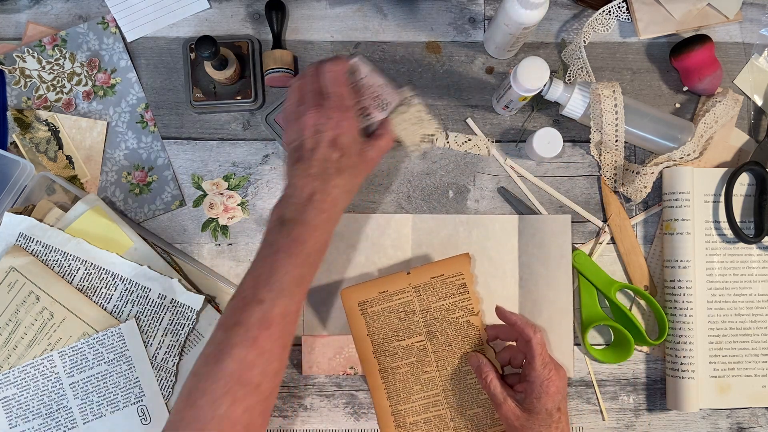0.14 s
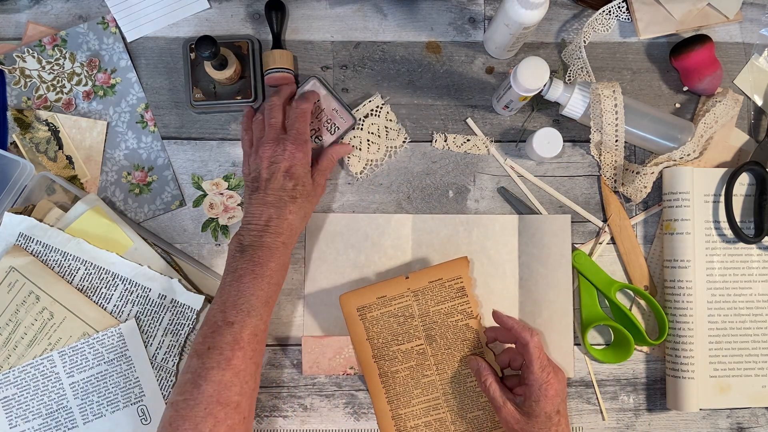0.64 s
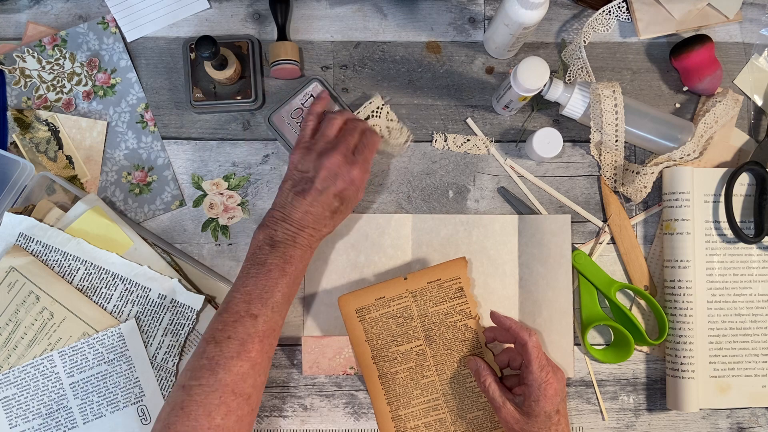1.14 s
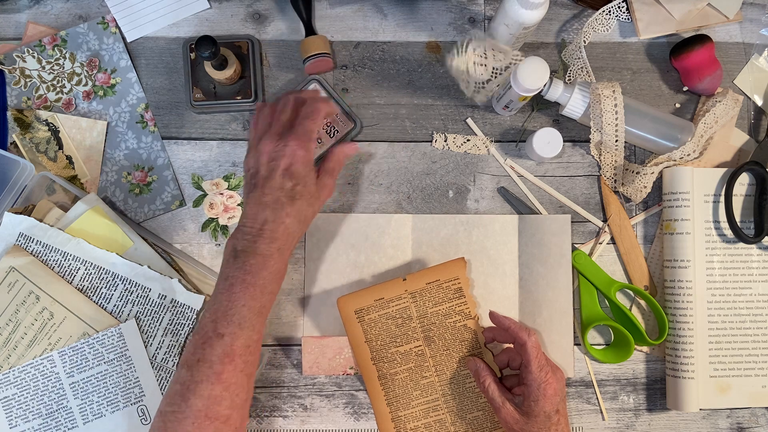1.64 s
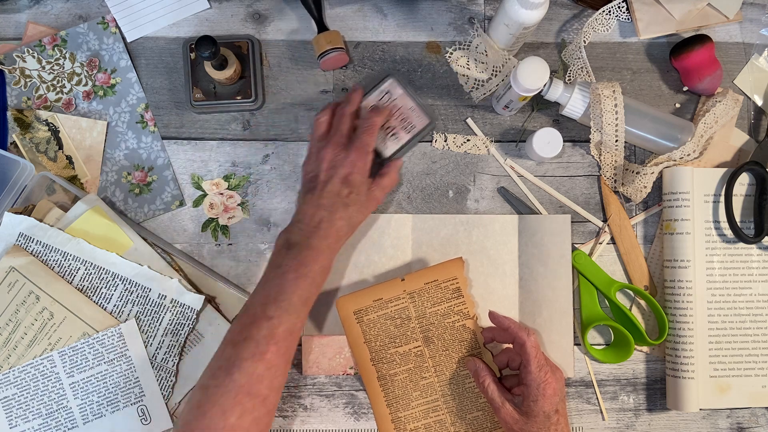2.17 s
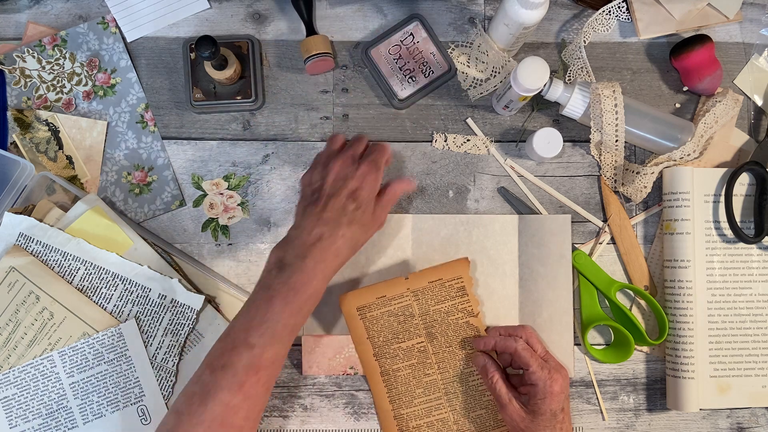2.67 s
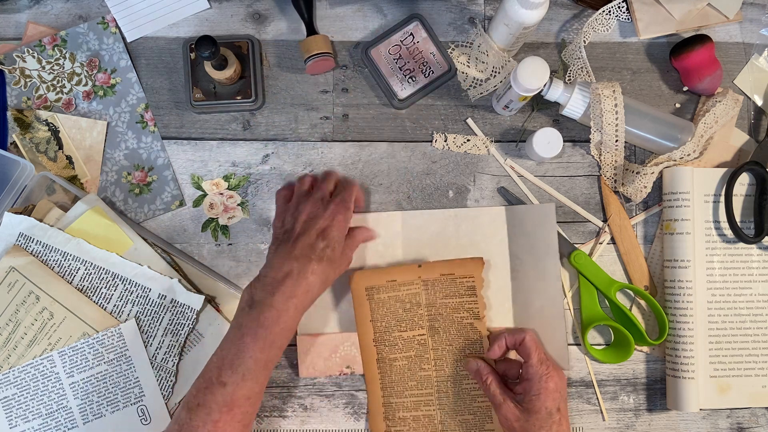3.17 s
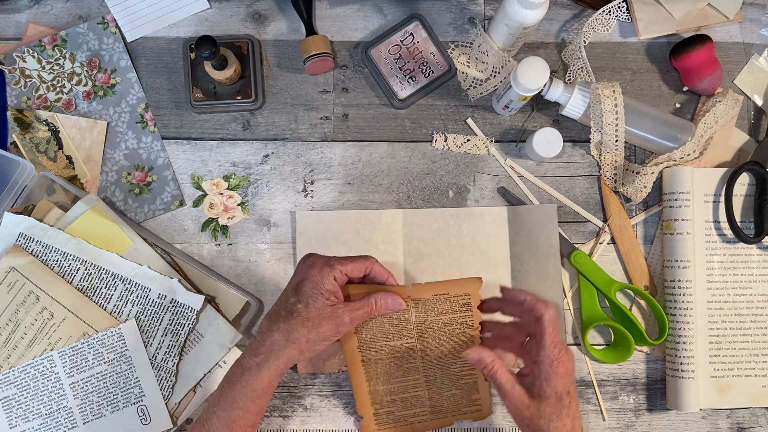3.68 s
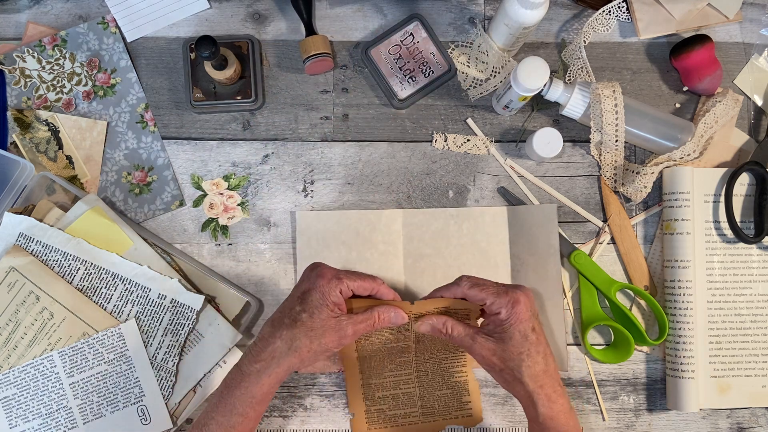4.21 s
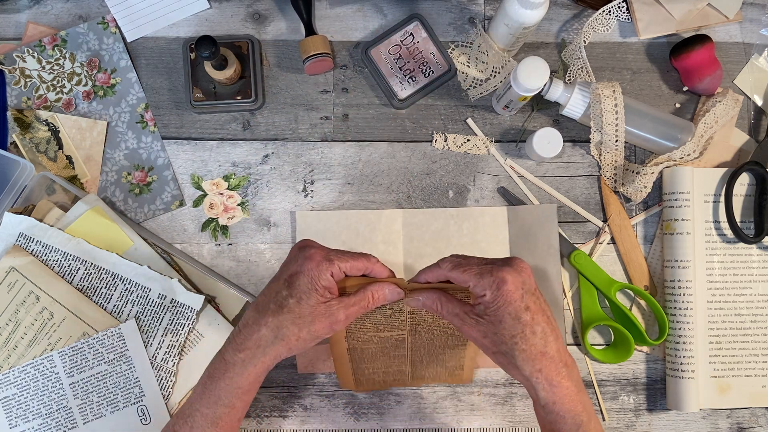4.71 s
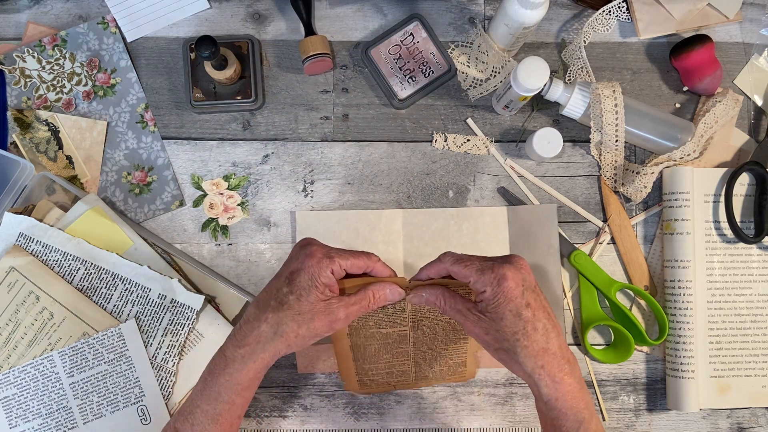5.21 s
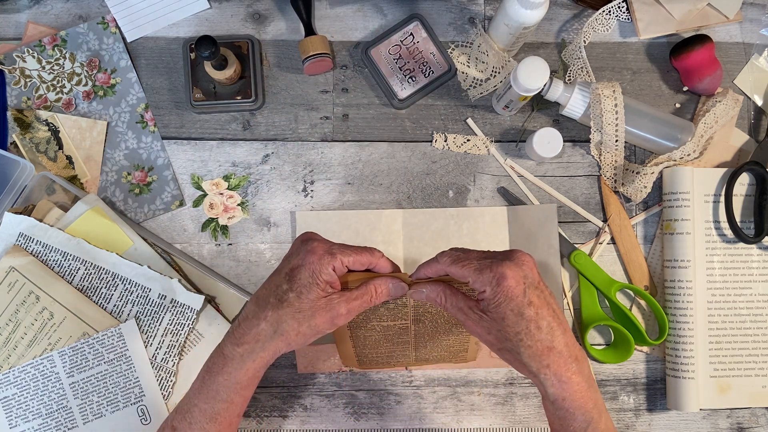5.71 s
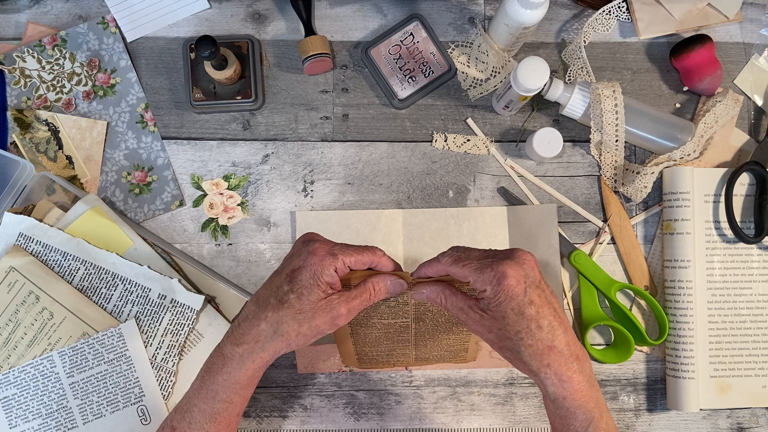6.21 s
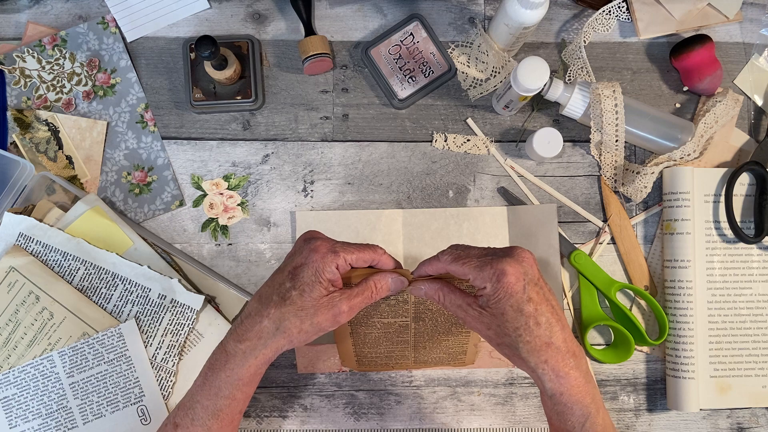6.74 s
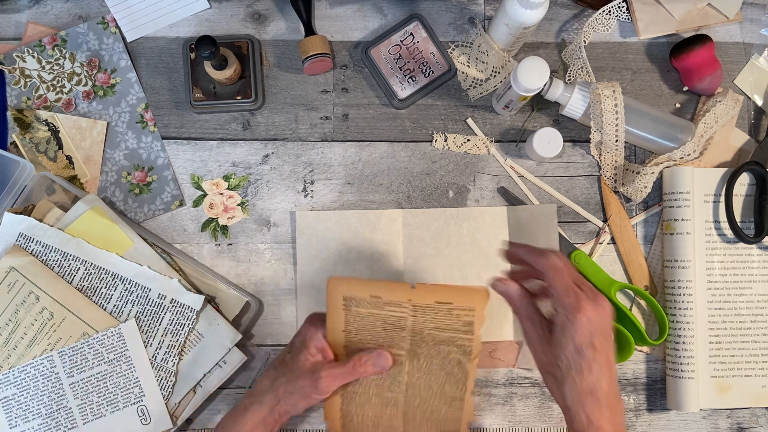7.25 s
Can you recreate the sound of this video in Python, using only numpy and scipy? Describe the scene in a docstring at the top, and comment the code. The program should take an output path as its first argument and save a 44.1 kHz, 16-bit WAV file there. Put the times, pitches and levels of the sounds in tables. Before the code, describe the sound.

A quiet, dry room with a faint low rumble, heard closely in stereo at a wooden craft table. After a barely audible brush at the start, a hollow plastic case clicks and rattles at 0.5-0.8 s, with faint handling, then clatters again at 1.15-1.4 s as its lid closes. At 1.8 s it is set down with the strongest plastic knock and a soft table thud, then scrapes away until about 2.5 s, with another click at 2.2. From 2.7 s, dry paper rustles and slides, with small snaps near 3.0, 3.6 and 4.6 s and very light thuds. From about 4.9 to 6.8 s it is nearly silent, with only tiny crackles and faint rubbing as paper is pinched. At 6.85 s rustling returns, with sharp loud snaps around 7.0 and 7.2 s and brisk crinkling to the end.

```python
"""Sheets of old paper slide, are picked up, pinched and snap at a wooden craft table: grainy noise makes
the rustle, short crackling bursts the snaps. Before that, hands click a small plastic case shut, set it
down and push it away: brief contacts and scraping ring the shell's resonances. Thuds are decaying
sines of the table top. A quiet room rumbles below, with short dull echoes; two microphone ports hear
it all, with level and phase offsets between them."""
import sys
import numpy as np
from scipy import signal
from scipy.fft import rfft, irfft, next_fast_len
from scipy.io import wavfile

SR = 44100
rng = np.random.default_rng(int(sys.argv[2]) if len(sys.argv) > 2 else 0)


def materialize(psi):
    """Save the field psi as 16-bit PCM at rate SR to the path in sys.argv[1].

    A 1-D psi becomes a single channel; in a 2-D psi each row is a channel.
    """
    bounded = np.clip(np.atleast_2d(psi).T, -1, 1)
    quanta = np.round(bounded * 32767).astype(np.int16)
    wavfile.write(sys.argv[1], SR, quanta)


def gain_from_db(level_db):
    """Turn a decibel level (scalar or array-like) into a linear amplitude factor."""
    decades = np.asarray(level_db, float) / 20
    return 10 ** decades


N = 325017   # samples, about 7.4 s

# rustling and rubbing noises of paper, skin and sliding case; the first is a brief noise at the opening:
# (start [s], length [s], rustle level [dB], flex re rustle [dB], fine hiss re rustle [dB])
RUBBING_STROKES = [(0, 0.021, -61.5, -8, -0.5), (.15, 0.075, -72.5, -16, 2.5), (.3, 0.02, -75.5, 1, 0),
                   (.51, 0.3, -69.5, -8, -4.5), (.955, .14, -72.5, -5.5, -3), (1.13, .26, -65, -13, -5),
                   (1.7, 0.054, -87.5, 4, 13), (1.8, 0.024, -44, -10, -2.5), (1.86, 0.058, -63.5, 0, -4),
                   (1.94, .53, -51.5, -9, 2.5), (2.56, 0.15, -76, -5, 2), (2.715, 0.1, -64.5, -4.5, -1),
                   (2.84, 0.22, -53.5, -11, -3), (3.05, .22, -54.5, -14, -2),
                   (3.28, 0.14, -60.5, 0.5, -1.5), (3.53, 0.093, -59, 3.5, -0.5),
                   (3.59, 0.13, -70.5, 6.5, 3), (3.71, 0.061, -65.5, -1.5, -1.5),
                   (3.795, 0.093, -57.5, -13.5, -4.5), (3.93, 0.23, -71, -10.5, 0.5),
                   (4.145, 0.27, -56, -7, 0), (4.44, 0.15, -63.5, -7.5, -1.5),
                   (4.6, 0.46, -70.5, -6.5, -3.5), (4.62, 0.11, -68, 0, 0), (4.76, .08, -63.5, -6.5, -1),
                   (4.9, 0.14, -73, 3.5, -1), (5.08, .08, -76, 12, 2), (5.15, 0.13, -74, -0.5, -2),
                   (5.27, 0.079, -69.5, -3, 1), (5.43, 0.25, -69, -7.5, 2), (5.7, 1.17, -95.5, 9.5, -1),
                   (6.06, 0.14, -73.5, -3, -1.5), (6.23, 0.038, -87, -6, 2), (6.43, 0.049, -82.5, 7, -7),
                   (6.58, 0.12, -92.5, 13.5, 3), (6.845, 0.29, -53, -5.5, 1.5),
                   (7.03, 0.063, -58.5, 4.5, -3), (7.11, 0.14, -47, -4, -2),
                   (7.265, 0.067, -48, -6.5, -1.5), (7.345, 0.086, -48.5, 1, -8)]
# hands at rest still stir the paper: (rustle [dB], flex [dB], hiss [dB])
RESTING_LEVELS = (-85, -87.5, -85)
# colour of the rustle: (frequency [Hz], gain [dB])
RUSTLE_COLOUR = [(150, -18), (400, -13), (900, -3), (1500, 0), (3000, 0), (6000, -1), (9000, -5),
                 (15500, -14)]
# pitches favoured by the sheets and the boards under them: (frequency [Hz], width [Hz], middle level [dB])
SHEET_MODES = [(1020, 400, -4.5), (1572, 150, -1), (2008, 390, -5.5)]
# every stroke swells over a share of its length, arches (ends below middle) and lets go (time constant)
ATTACK_SHARE, ARCH_DB, RELEASE_S = 0.14, 4.5, 0.027

# spectral shape of the room tone: (frequency [Hz], relative density [dB])
ROOM_COLOUR = [(12, -39), (20, -9), (49, -1.5), (101, -10), (148, -22.5), (306, -28.5), (549, -38.5),
               (906, -43.5), (1380, -45.5), (1500, -51.5), (1820, -39), (3000, -48.5), (15500, -55)]
ROOM_DB = -66   # middle rms level

# lid and case clicks: (time [s], peak level [dB], belly mode boost below 2.3 kHz [dB], treble mode boost above
# 4.3 kHz [dB])
CASE_CLICKS = [(0.513, -23.5, 4, 2), (0.569, -31, 8, -18), (0.582, -32, 5, -13), (0.614, -32, 20.5, 10.5),
               (0.673, -30, 10, -6), (0.684, -34, 20, -31), (0.807, -46, 5.5, -7), (1.159, -50, 14, -10),
               (1.175, -28.5, 8.5, -4.5), (1.219, -45, -6, -15), (1.224, -27.5, 14.5, -1),
               (1.293, -40.5, 20, -16), (1.302, -23.5, 1, 2), (1.33, -29.5, 9.5, 2), (1.344, -38.5, 8, -16),
               (1.377, -36.5, -0.5, -30), (1.729, -60, -17, 25), (1.802, -20, 10, 3),
               (1.895, -51.5, 8, -25), (2.223, -24.5, -11, 2), (2.39, -38, -25, -41)]
# resonances of the plastic case: (frequency [Hz], width [Hz], level [dB])
CASE_MODES = [(500, 150, -20), (1010, 110, -12), (1180, 130, -5), (1430, 110, -4), (1640, 110, -2),
              (1870, 120, -2), (2700, 150, -2), (2890, 150, 0), (3700, 160, -5), (4860, 150, -3),
              (5950, 180, 0), (6950, 200, -12), (8200, 300, -16)]
# fingers shift the case: (start [s], length [s], rim level [dB], belly re rim [dB], table rumble re rim [dB])
CASE_SHIFTS = [(.52, .11, -58, -6, -7), (.67, 0.041, -69.5, 15, 3), (.8, 0.05, -82.5, 10, 23.5),
               (.94, 0.21, -92, -7, 13.5), (1.16, 0.1, -63.5, 11.5, 3.5), (1.29, 0.082, -60, 11.5, 1),
               (1.47, 0.055, -94, -7, 25), (1.8, .1, -67, 9.5, 14.5)]
# the case is pushed away over the boards: (time [s], rim level [dB])
CASE_PUSH = [(1.93, -69), (1.974, -60.5), (2.05, -58), (2.154, -50.5), (2.25, -57), (2.33, -53),
             (2.426, -47.5), (2.54, -77.5)]
PUSH_BELLY_DB, PUSH_RUMBLE_DB = -16, -10.5   # re rim
CHATTER_S = 0.0025   # time constant of a click's short chatter of contacts
# clicks after this time: the lid is shut, the lowest modes gain and the upper belly modes are damped
SHUT_S, SHUT_LOW_DB, SHUT_HIGH_DB = 1.27, 10, -9.5

# thuds into the table top: (time [s], peak level [dB])
TABLE_THUDS = [(0.824, -41.5), (0.942, -49.5), (1.061, -52), (1.248, -50), (1.33, -48.5), (1.812, -26),
               (1.892, -45), (1.903, -38.5), (2.035, -42), (2.068, -41), (2.102, -38), (2.84, -45.5),
               (3.025, -48), (4.622, -47.5), (5.108, -55.5), (7.018, -43), (7.185, -44)]
# low modes of the table top: (frequency [Hz], level [dB], time to decay by 60 dB [s])
TABLE_MODES = [(84.7, -9.5, 0.19), (133.3, 2, 0.097), (163.8, -2, 0.067), (294, -4.5, .05),
               (436, -6.5, 0.053)]

# paper snaps: (time [s], peak level [dB], centre frequency [Hz], crisp edge re fold [dB])
PAPER_SNAPS = [(2.719, -47.5, 4740, 25), (2.831, -48.5, 5130, -3), (2.965, -58, 2560, -6),
               (2.985, -31.5, 1790, -37), (3.267, -43.5, 1670, -10), (3.369, -39.5, 1230, -18),
               (3.534, -51, 4750, -11), (3.573, -35, 970, -18), (3.706, -45.5, 1030, -6),
               (3.862, -44, 4650, 29), (4.147, -48.5, 2670, 17), (4.291, -44, 4400, -14),
               (4.337, -40.5, 5500, -17), (4.419, -44, 990, -5), (4.62, -30, 910, -24),
               (4.994, -45, 4600, 22), (5.021, -47, 4700, -12), (5.087, -47, 1090, -11),
               (5.099, -47, 1110, -3.5), (5.124, -41, 750, -16.5), (5.166, -53.5, 1020, -11),
               (5.637, -47, 1970, 10), (5.655, -57, 1580, -9), (5.676, -55, 1420, 2),
               (6.443, -62, 1600, -8), (6.487, -65, 1750, -7), (6.597, -62, 1650, -8),
               (6.632, -61, 1670, -1), (6.892, -42.5, 1770, -15), (7.016, -24.5, 5000, -30),
               (7.021, -18, 1540, -6), (7.054, -39, 875, -4), (7.088, -38.5, 3660, 3),
               (7.113, -38, 1170, 3), (7.159, -42, 1090, -5), (7.184, -24, 1000, -15),
               (7.193, -27.5, 970, 10), (7.204, -37, 1110, 9), (7.309, -35.5, 4400, -8),
               (7.36, -29, 840, -45)]
# harder snaps are over sooner: length at the usual peak level, and dB of length lost per dB of peak
SNAP_S, USUAL_SNAP_DB, QUICKENING = 0.0082, -32, 0.084
EDGE_TICK_S, EDGE_TICK_DB = 0.0015, 8   # the edge opens with a sharp tick; level is a gain on its noise

ECHO_DB, ECHO_T60_S = -24.5, 0.15
# phase by which the left port leads: (frequency [Hz], lead [rad])
PORT_LEAD = [(0, 0), (780, .2), (1700, .1), (2500, .7), (4500, .6), (5400, .9), (7150, 3.14), (10400, 6.28),
             (13650, 9.42), (15700, 12.0)]
# level balance of the ports: (frequency [Hz], left re right [dB])
PORT_BALANCE = [(40, -.7), (130, -2), (290, -2.9), (640, -2.6), (1300, -.1), (2500, -1.5), (4500, -2),
                (5500, 0), (15000, 0)]
# echoes the ports do not share: (frequency [Hz], gain [dB])
UNSHARED_ECHOES = [(60, -32), (300, -15), (700, -15), (1400, -22), (3000, -14), (8000, -9), (15000, 0)]
# upper edge of the recorder: (frequency [Hz], gain [dB])
TOP_ROLL_OFF = [(20, 0), (15700, 0), (15800, -45), (17000, -60)]


def rms_one(x):
    """Scale to unit rms."""
    return x / np.sqrt(np.mean(x ** 2) + 1e-20)


def at_hz(points, hz):
    """Read a frequency table on a logarithmic axis."""
    table_hz, values = np.transpose(points)
    return np.interp(np.log(hz + 1), np.log(table_hz), values)


def colour(x, spectrum):
    """Filter by a table of gains in dB over frequency."""
    size = next_fast_len(N)
    gain = gain_from_db(at_hz(spectrum, np.fft.rfftfreq(size, 1 / SR)))
    return irfft(rfft(x, size) * gain, size)[..., :N]


def drift(rate_hz):
    """Random wander of unit rms: noise smoothed by two equal poles at the given rate."""
    r = np.exp(-2 * np.pi * rate_hz / SR)
    wander = signal.lfilter([1], [1, -2 * r, r * r], rng.standard_normal(N + SR))
    return rms_one(wander[SR:])   # the first second lets the filter settle


def resonate(x, hz, width_hz):
    """One two-pole resonance with a gain of about 1 at its peak."""
    r = np.exp(-np.pi * width_hz / SR)
    poles = [1, -2 * r * np.cos(2 * np.pi * hz / SR), r * r]
    return signal.lfilter([(1 - r * r) / 2, 0, (r * r - 1) / 2], poles, x)


def cut(x, hz, kind):
    """Second-order low- or high-pass."""
    return signal.sosfilt(signal.butter(2, hz, kind, fs=SR, output="sos"), x)


def add(out, s, sound, peak_db):
    """Place a short sound at its time, scaled to its peak level."""
    at = round(s * SR)
    scaled = gain_from_db(peak_db) * sound / np.abs(sound).max()
    out[at:at + len(sound)] += scaled[:N - at]


def grains(per_s, spread_db):
    """Random micro-slips of uneven size over a bed of noise."""
    size_db = spread_db * np.minimum(rng.exponential(1, N), 3)
    slips = gain_from_db(size_db) * rng.standard_normal(N)
    happens = rng.random(N) < per_s / SR
    return rms_one(rng.standard_normal(N) + 2.1 * slips * happens)


def burst(noise, length_s, rise_share, fall):
    """A short run of contacts that swells and dies; a larger fall ends it more abruptly."""
    t = np.arange(len(noise)) / SR / np.clip(length_s, 0.0005, 0.04)   # in lengths
    rise = 1 - np.exp(-t / np.clip(rise_share, 0.01, 3))
    return noise * rise * np.exp(-t ** fall)


def strokes(rows):
    """Gains of three layers: each stroke swells, arches and lets go; overlaps add in power."""
    t = np.arange(N) / SR
    power = np.zeros((3, N)) + 1e-14
    for s, length_s, db, second_db, third_db in rows:
        span = slice(max(round(s * SR), 0), round((s + length_s + 12 * RELEASE_S) * SR))
        since = t[span] - s
        swell = np.minimum(since / (ATTACK_SHARE * length_s), 1)
        arch = gain_from_db(-ARCH_DB * np.minimum(2 * since / length_s - 1, 1) ** 2)
        release = np.exp(-np.maximum(since - length_s, 0) / RELEASE_S)
        layer_db = db + np.array([[0], [second_db], [third_db]])
        power[:, span] += (gain_from_db(layer_db) * swell * arch * release) ** 2
    return np.sqrt(power)


def rubbing():
    """Paper, skin and sliding case rub in grainy noise; each stroke has its own share of flex and hiss."""
    resting = gain_from_db(np.array(RESTING_LEVELS))[:, None]
    rustle_gain, flex_gain, hiss_gain = np.hypot(strokes(RUBBING_STROKES), resting)
    slips = colour(grains(600, spread_db=3.3), RUSTLE_COLOUR) * gain_from_db(1.5 * drift(28))
    flex = cut(cut(slips, 1700, "low"), 2000, "low")
    for hz, width_hz, db in SHEET_MODES:
        flex = flex + gain_from_db(db + 3 * drift(5)) * resonate(slips, hz, width_hz)
    rustle = cut(cut(slips, 2100, "high"), 7000, "low")
    hiss = cut(slips, 6500, "high")
    flexing = rms_one(flex) * flex_gain * gain_from_db(2.5 * drift(17))   # flexing flutters in level
    return rms_one(rustle) * rustle_gain + flexing + rms_one(hiss) * hiss_gain


def room_tone():
    """Steady noise, heaviest in the bass, that wavers slightly in level."""
    rumble = rms_one(colour(rng.standard_normal(N), ROOM_COLOUR))
    return gain_from_db(ROOM_DB + 0.41 * drift(2.5)) * rumble


def shell(contact, belly_db, treble_db, own_db):
    """The hollow plastic case rings: low modes of its belly, strong middle modes, high modes of its rim."""
    out = 0
    for (hz, width_hz, db), own in zip(CASE_MODES, own_db):
        mode_db = db + own + belly_db * (hz < 2300) + treble_db * (hz > 4300)
        out = out + gain_from_db(mode_db) * resonate(resonate(contact, hz, width_hz), hz, 5 * width_hz)
    return out


def shut_lid_db():
    """Change of each shell mode, in dB, with the lid shut."""
    hz = np.array(CASE_MODES)[:, 0]
    return SHUT_LOW_DB * (hz < 1100) + SHUT_HIGH_DB * ((hz > 1500) & (hz < 2300))


def case_clicks():
    """Chattering contacts excite the shell, each click with its own mode strengths."""
    out = np.zeros(N)
    noises = rng.standard_normal((len(CASE_CLICKS), 4000))
    chance_db = rng.normal(0, 3, (len(CASE_CLICKS), len(CASE_MODES)))
    for (s, peak_db, belly_db, treble_db), noise, own_db in zip(CASE_CLICKS, noises, chance_db):
        own_db = own_db + shut_lid_db() * (s > SHUT_S)
        contact = burst(noise, CHATTER_S, rise_share=0.12, fall=1)
        direct = gain_from_db(-40 + treble_db) * contact   # a little of the bare contact
        add(out, s, shell(contact, belly_db, treble_db, own_db) + direct, peak_db)
    return out


def case_dragging():
    """Scraping excites the shell's rim and belly, with the shut lid's mode balance used throughout."""
    t = np.arange(N) / SR
    push_s, rim_db = np.transpose(CASE_PUSH)
    moving = (t > push_s[0]) & (t < push_s[-1])
    layer_db = np.interp(t, push_s, rim_db) + np.array([[0], [PUSH_BELLY_DB], [PUSH_RUMBLE_DB]])
    gains = np.hypot(strokes(CASE_SHIFTS), moving * gain_from_db(layer_db))
    scrape = grains(600, spread_db=3) * gain_from_db(3 * drift(40))
    rim = rms_one(shell(scrape, -50.5, -5.5, shut_lid_db()))   # middle and high modes
    belly = rms_one(cut(shell(scrape, 0, -57, shut_lid_db()), 1800, "low"))
    # the boards shudder under the case
    rumble = rms_one(cut(cut(cut(scrape, 500, "low"), 550, "low"), 190, "high"))
    return (gains * [rim, belly, rumble]).sum(axis=0)


def thuds():
    """Soft blows bend the table top down and ring its low modes, each blow in its own mix."""
    out = np.zeros(N)
    t = np.arange(SR // 3) / SR
    chance_db = rng.normal(0, 2, (len(TABLE_THUDS), len(TABLE_MODES)))
    for (s, peak_db), own_db in zip(TABLE_THUDS, chance_db):
        rings = 0
        for (hz, db, t60), own in zip(TABLE_MODES, own_db):
            rings = rings + gain_from_db(db + own - 60 * t / t60) * np.sin(2 * np.pi * hz * t)
        soft_onset = 1 - np.exp(-t / 0.0087)
        add(out, s, -rings * soft_onset, peak_db)
    return out


def paper_snaps():
    """A buckle flips: a crackling burst, broad around the pitch of the fold, with a crisp edge."""
    out = np.zeros(N)
    noises = rng.standard_normal((len(PAPER_SNAPS), 2, 5000))
    for (s, peak_db, hz, edge_db), (noise, lumps) in zip(PAPER_SNAPS, noises):
        length_s = SNAP_S * gain_from_db(QUICKENING * (USUAL_SNAP_DB - peak_db))
        crackle = burst(noise * gain_from_db(3.2 * lumps), length_s, rise_share=0.44, fall=1.25)
        tick = gain_from_db(EDGE_TICK_DB) * burst(noise, EDGE_TICK_S, rise_share=0.1, fall=1)
        edge = cut(cut(crackle + tick, 2000, "high"), 11000, "low")
        fold = resonate(resonate(crackle, hz, 0.5 * hz), hz, 3.3 * hz)
        add(out, s, rms_one(fold) + gain_from_db(edge_db) * rms_one(edge), peak_db)
    return out


def echoes(x):
    """The room answers with a dull dying tail of noise, another at each port."""
    t = np.arange(SR // 2) / SR
    dull = cut(rng.standard_normal((2, len(t))), 3180, "low")
    tail = dull * gain_from_db(-60 * t / ECHO_T60_S) * (t > 0.003)
    tail = tail / np.sqrt((tail ** 2).sum(axis=1, keepdims=True))   # unit energy
    return signal.fftconvolve(x[None], tail, axes=1)[:, :N]


def ports(x):
    """Both ports hear the same sound; the right lags in phase, the more so in the treble."""
    size = next_fast_len(N + 2000)
    hz = np.fft.rfftfreq(size, 1 / SR)
    lead = np.interp(hz, *np.transpose(PORT_LEAD))
    # half of each offset goes to the left, the opposite half to the right
    half = gain_from_db(at_hz(PORT_BALANCE, hz) / 2) * np.exp(0.5j * lead)
    return irfft(rfft(x, size) * [half, 1 / half], size)[:, :N]


def scene():
    """Near sources, their echoes, thuds and the room tone, through the two ports."""
    near = rubbing() + case_clicks() + case_dragging() + paper_snaps()
    room = room_tone()
    shared = near + gain_from_db(ECHO_DB) * echoes(near)[0] + thuds() + room
    unshared = colour(echoes(near + room), UNSHARED_ECHOES) * [[1], [-1]]
    return ports(shared) + unshared


def low_pass(x):
    """Removes everything above the highest recorded frequency."""
    return signal.sosfilt(signal.butter(12, 17050, fs=SR, output="sos"), x)


def record(dry):
    """The recorder rolls off the top of the treble."""
    mix = colour(dry, TOP_ROLL_OFF)
    return low_pass(mix)


dry = scene()
out = record(dry)
materialize(out)
```